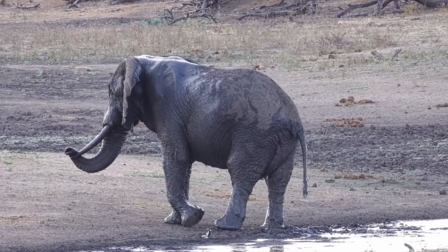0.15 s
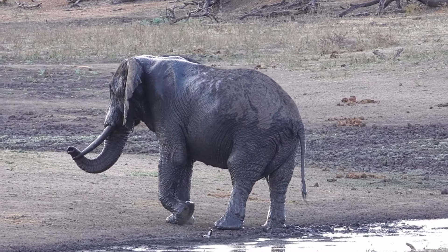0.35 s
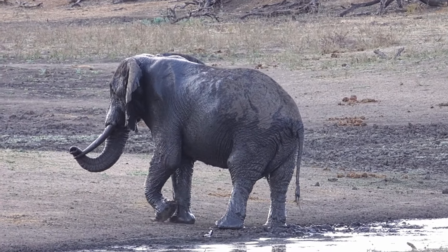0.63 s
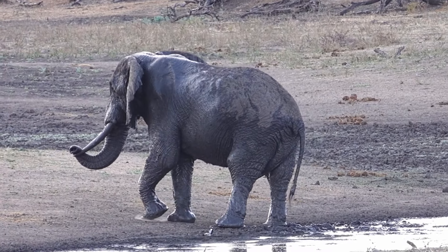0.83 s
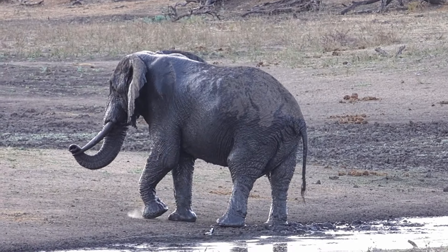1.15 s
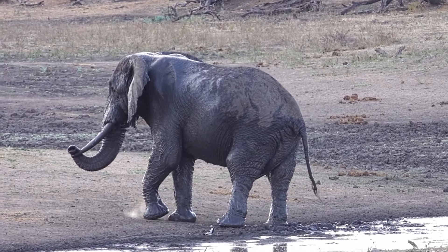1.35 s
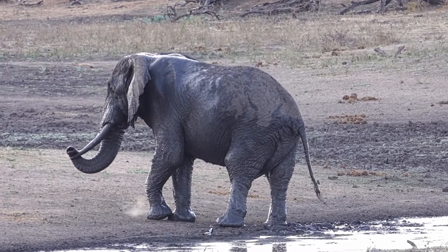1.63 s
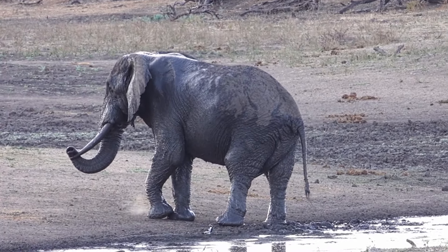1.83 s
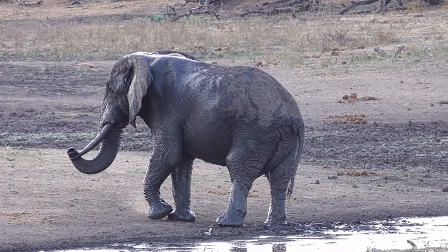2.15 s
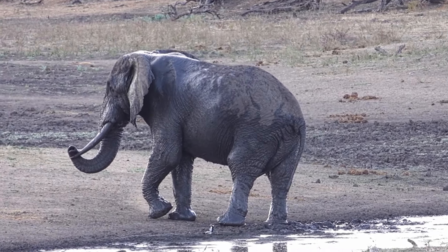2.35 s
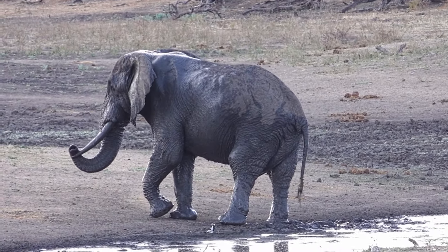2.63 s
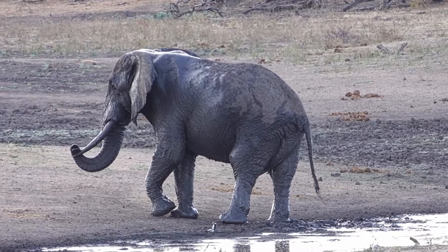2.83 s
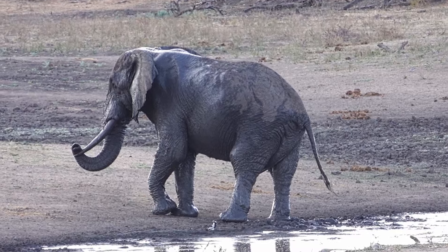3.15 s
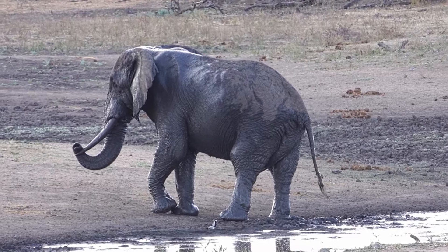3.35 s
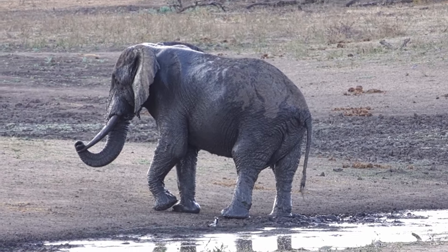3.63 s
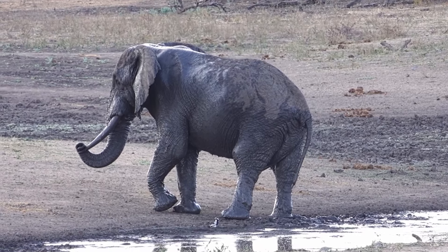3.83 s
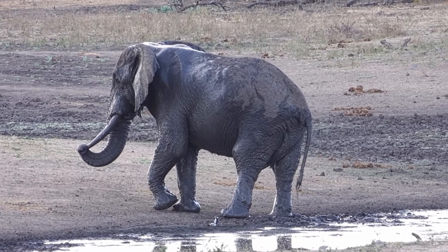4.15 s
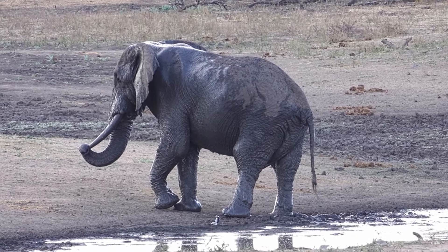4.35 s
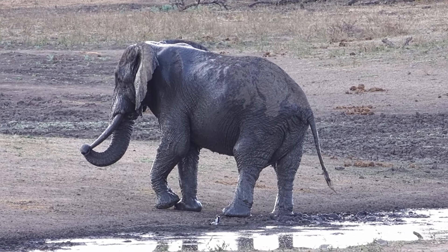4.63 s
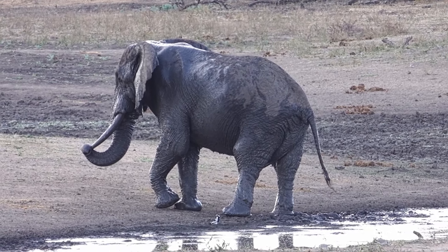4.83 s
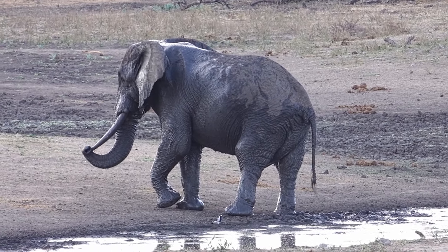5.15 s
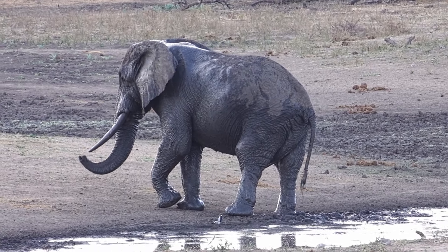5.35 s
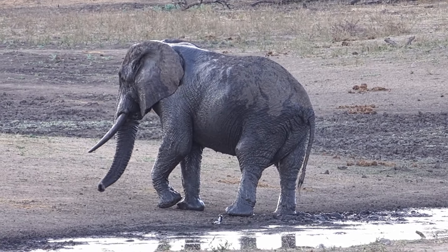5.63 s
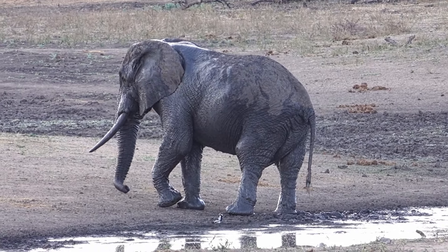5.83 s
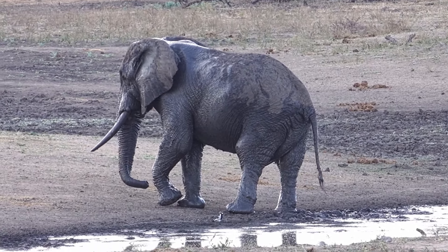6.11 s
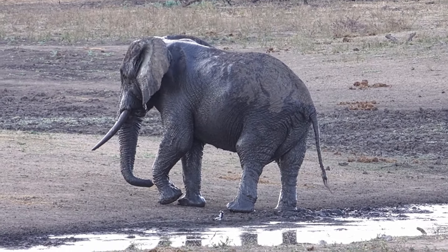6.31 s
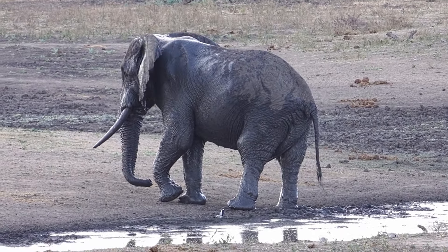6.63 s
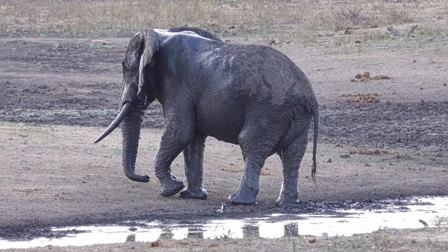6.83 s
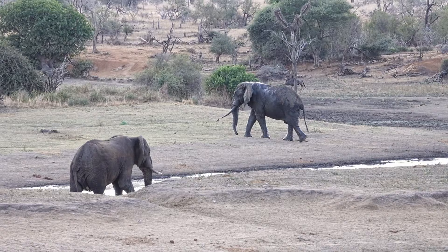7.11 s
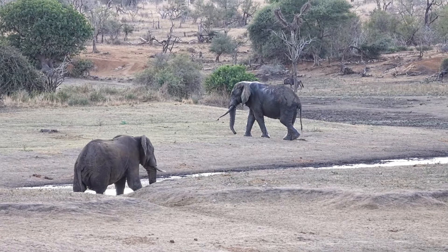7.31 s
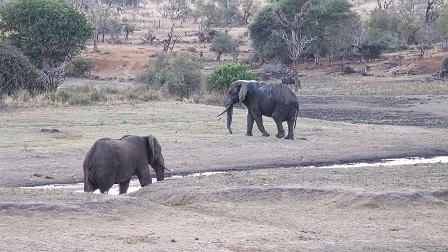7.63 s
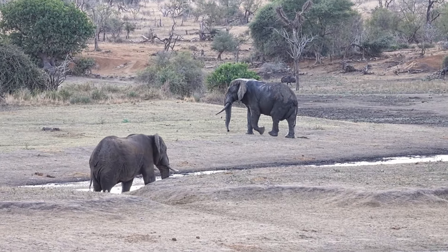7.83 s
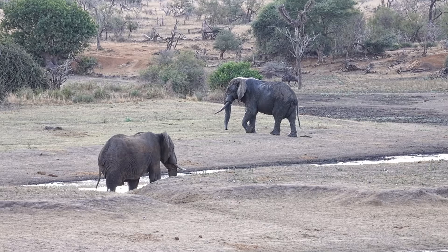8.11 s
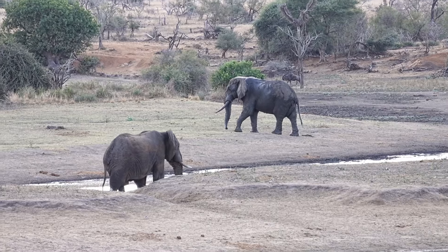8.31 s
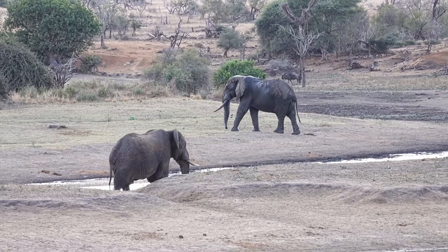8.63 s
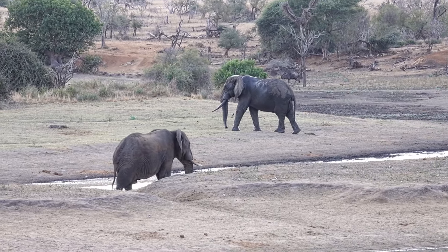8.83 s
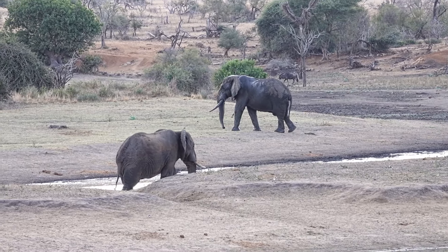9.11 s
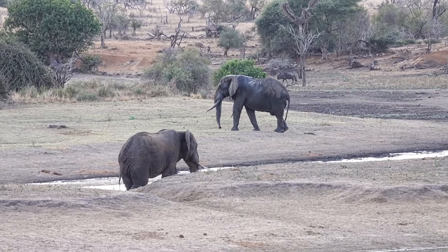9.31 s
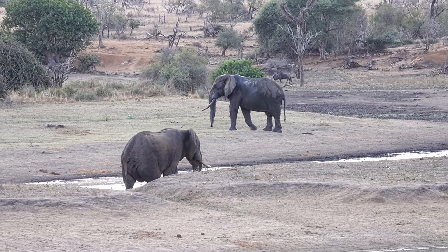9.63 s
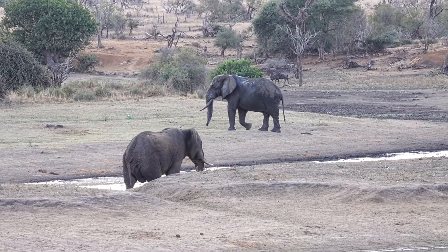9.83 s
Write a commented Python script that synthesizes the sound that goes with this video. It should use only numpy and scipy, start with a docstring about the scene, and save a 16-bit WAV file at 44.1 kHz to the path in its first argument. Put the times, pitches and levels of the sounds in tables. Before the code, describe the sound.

A wide, open waterhole in dry bush, heard through an exposed microphone. Throughout, a frog pips about fourteen times a second around a mid-high pitch, swelling and easing, over hiss, uneven low rumble, grassy breeze and a shimmering far chorus of chirps. A dove repeats a rolling, arched coo phrase about every 1.2 seconds. Deep wind buffets thump from 0.4 to 1 second, strongest at 1. Whistles cluster near 1.2, and a loud hoarse chip snaps at 1.55. Quick five-note twitters recur; buzzy, growing chirrups peak around 2.5, 3.1, 3.8, 4.5, 5.2, 6.1, 7.3 and 8.7. A scolding chatter comes at 3.6 and faintly at 9.4. A clear falling whistle rings at 5.9, more at 7.1 to 7.5. Dull close knocks come faintly at 2.1 and 5.4, then around 7 to 8.3 and 9.2 to 9.5, among rasps and distant downslurs.

```python
"""Birds and a frog call around a waterhole in dry bush.
From the start a frog pips steadily over hiss, rumble, breeze in the grass and a far chorus of chirps.
Gliding tones make falling notes, a dove's rolled phrase, ticks and whistles; noise bands make rasps.
Slowing swings buffet the microphone, mostly in the first second; quick twitters and far slurs join in.
Then come sharp chips, soft knocks of noise and dying modes, buzzy chirrups and a scolding chatter."""
import sys
import numpy as np
from scipy import signal
from scipy.fft import rfft, irfft, next_fast_len
from scipy.io import wavfile
from scipy.ndimage import uniform_filter1d

SR = 44100
rng = np.random.default_rng(int(sys.argv[2]) if len(sys.argv) > 2 else 0)


def dump(signal):
    """Clip the signal to [-1, 1] and save it as 16-bit WAV at the path in sys.argv[1]."""
    limited = np.clip(np.atleast_2d(signal).T, -1, 1)
    pcm = np.round(limited * 32767).astype(np.int16)
    wavfile.write(sys.argv[1], SR, pcm)


N = 439677
TIME = np.arange(N) / SR


def amp(db):
    """Decibels to gain."""
    return 10 ** (np.asarray(db) / 20)


def unit(x):
    """Scales to rms 1."""
    return x / np.sqrt(np.mean(abs(x) ** 2) + 1e-20)


def clock(length_s):
    """Sample times over a length, at least 16 samples."""
    return np.arange(max(int(length_s * SR), 16)) / SR


def follow(curve):
    """A curve of (time [s], value) rows at every sample."""
    return np.interp(TIME, *np.transpose(curve))


def add(mix, start_s, sound):
    """Mixes a sound in at its start time, cut to fit."""
    start = round(start_s * SR)
    sound = sound[max(-start, 0):]
    part = mix[max(start, 0):][:len(sound)]
    part += sound[:len(part)]


def noise(spectrum, size):
    """Noise of rms 1 shaped by (frequency [Hz], level [dB]) points."""
    hz, db = np.transpose(spectrum)
    padded = next_fast_len(size)
    log_hz = np.log(np.fft.rfftfreq(padded, 1 / SR) + 1)
    shape = amp(np.interp(log_hz, np.log(hz), db))
    return unit(irfft(rfft(rng.standard_normal(padded)) * shape, padded)[:size])


def drift(t, rate_hz):
    """Random values at a given rate, joined by straight lines."""
    points = rng.standard_normal(4096)
    return np.interp(t * rate_hz, np.arange(len(points)), points)


def tone(hz):
    """A sine of rms 1 that follows a pitch curve."""
    return np.sqrt(2) * np.sin(2 * np.pi * np.cumsum(hz) / SR)


def scatter(x, t60_s, wet_db):
    """Adds the many faint echoes of ground and bushes as sparse, decaying random taps."""
    t = clock(.7)
    sparse = rng.standard_normal(len(t)) * (rng.random(len(t)) < .1)
    taps = sparse * amp(-60 * t / t60_s) * (t > .003)
    return x + amp(wet_db) * signal.oaconvolve(x, taps / np.linalg.norm(taps))[:N]


def whistle(length_s, pitches_hz, crest, waver=.004, flutter_db=2):
    """A pure note gliding through three pitches, swelling to its crest (share of length) and fading."""
    t = clock(length_s)
    u = t / t[-1]
    glide_hz = np.polyval(np.polyfit(np.arange(3) / 2, pitches_hz, 2), u)
    hz = glide_hz * (1 + waver * drift(t, 250))
    ramp = np.interp(u, [0, np.clip(crest, .1, .85), 1], [0, 1, 0])
    swell = np.sin(np.pi / 2 * ramp) ** .9
    return unit(tone(hz) * swell * amp(flutter_db * drift(t, 110)))


def rasp(length_s, hz, width_hz):
    """A harsh note: a band of noise around its pitch."""
    size = len(clock(length_s))
    skirt = 1 + width_hz / hz
    band = [(hz / skirt ** 3, -55), (hz / skirt, -14), (hz, 0), (hz * skirt, -14), (hz * skirt ** 3, -55)]
    return unit(noise(band, size) * signal.windows.tukey(size, .8))


def frog(pitch_hz=1542, sag_hz_per_s=6500, width_s=0.0043, uneven_db=1.45):
    """About fourteen short pips a second, slowing as it tires, uneven in strength and sagging in pitch."""
    # effort swelling and easing in bouts: (time [s], level [dB])
    effort = [(0.0, -67), (1.41, -46), (2.65, -45), (2.76, -41), (3.5, -52.5), (4.22, -44), (4.82, -56),
              (6.12, -50.5), (6.37, -43.5), (7.06, -54.5), (7.53, -47), (8.24, -46), (8.8, -50.5),
              (8.88, -43), (9.68, -52.5), (9.9, -49.5)]
    first_pip_s, pips_per_s, tires_at_s = -.008, 14.04, 3.65
    slowing = .0656  # pips/s lost each second
    peak_db = 13.5  # pip peak over the effort
    count = pips_per_s * (TIME - first_pip_s) - slowing * np.maximum(TIME - tires_at_s, 0) ** 2 / 2
    pip = np.round(count).astype(int)
    t = (count - pip) / np.gradient(count) / SR  # seconds from the nearest pip
    strength, detune = rng.standard_normal((pip.max() + 1, 2))[pip].T
    turns = pitch_hz * (1 + 0.01 * detune) * t - sag_hz_per_s * t ** 2 / 2
    envelope = amp(uneven_db * strength) * np.exp(-.5 * (t / width_s) ** 2)
    pips = envelope * np.sin(2 * np.pi * turns)
    return scatter(pips * amp(follow(effort) + peak_db), t60_s=.25, wet_db=-10)


def air():
    """Steady hiss, an uneven low rumble and the breeze in the dry grass, all shaped noise."""
    # hiss spectrum: (frequency [Hz], level [dB])
    hiss_spectrum = [(12, -31), (20, -9.5), (60, 1), (347, -18.5), (949, -25), (1370, -17.5), (1530, -13.5),
                     (1710, -13.5), (1910, -13), (3340, -14.5), (3950, -15), (6540, -33.5), (9950, -39.5),
                     (14300, -38), (16000, -39.5)]
    # breeze strength: (time [s], level [dB])
    breeze = [(0.0, -59), (0.77, -49), (1.39, -60), (1.8, -55.5), (6.05, -64), (7.94, -59), (8.36, -65.5),
              (9.97, -66)]
    # grass rustle spectrum: (frequency [Hz], level [dB])
    rustle_spectrum = [(100, -8), (250, -10), (700, 1.5), (1300, -3), (2500, -10), (8000, -42)]
    rustle_db = 4.5  # over the breeze strength
    eddies = noise([(15, -17), (35, 3.5), (70, -10.5), (150, -13), (400, -27.0), (2000, -79)], N)
    rumble = eddies * amp(-49.5 + 2.2 * drift(TIME, 7.9))
    hiss = amp(-45.5) * noise(hiss_spectrum, N)
    rustle = amp(follow(breeze) + rustle_db) * noise(rustle_spectrum, N)
    return hiss + rumble + rustle


def far_chorus(count=620):
    """Many distant chirps with dense echoes over a shimmering wash of noise."""
    # chorus spectrum: (frequency [Hz], level [dB])
    spectrum = [(1200, -28), (1700, -2.5), (2300, -3.5), (3000, -3.5), (3600, -2.5), (3950, 6.5),
                (4400, -10.5), (5200, -14), (6500, -26), (9000, -37)]
    level_db, swell_db, swell_rate_hz = -46.5, 0.5, 3.03
    wash_db = -4  # the most distant chirps merge into a wash; level relative to the rest
    chirps = np.zeros(N)
    for when, pitch, length, glide, size in rng.random((count, 5)):
        hz = 2400 + 4200 * pitch ** 1.5
        bend = 0.1695 * (glide - .25)  # most of them fall
        db = 10 * size + np.interp(hz, *np.transpose(spectrum)) + 3 * (hz / 4000) ** 2
        pitches_hz = hz * np.array([1 + bend, 1, 1 - bend])
        note = whistle(.012 + .05 * length, pitches_hz, .4, waver=.012)
        add(chirps, when * TIME[-1], amp(db) * note)
    wash = noise(spectrum, N) * amp(1.3 * drift(TIME, 25))
    mix = unit(scatter(chirps, t60_s=.35, wet_db=-3)) + amp(wash_db) * wash
    return amp(level_db + swell_db * drift(TIME, swell_rate_hz)) * mix


def falling_notes(count=22):
    """Notes that drop fast and level off: some stand out, fainter ones come at random."""
    # notes from a little farther off: (start [s], length [s], middle pitch [Hz], level [dB])
    falls = [(.04, 0.071, 3680, -41.5), (0.189, 0.081, 3620, -40), (0.453, 0.093, 3480, -49),
             (0.807, 0.065, 3280, -38.5), (0.956, 0.07, 3440, -39), (3.387, 0.065, 3240, -44.5),
             (4.496, 0.078, 2950, -40.5), (4.626, 0.08, 2950, -41), (4.989, .14, 4150, -47),
             (5.098, .075, 3080, -42), (5.37, 0.13, 4110, -46), (5.49, 0.066, 3950, -43),
             (6.683, 0.1, 2960, -43), (7.61, 0.056, 2950, -45), (7.899, 0.088, 3570, -39.5),
             (8.42, .15, 3030, -46.5), (8.899, .12, 3100, -45), (9.878, 0.097, 3390, -45.5)]
    shape, crest = (1.16, 0.97, .89), 0.54  # pitch factors at start, middle and end
    stray_db, stray_hz = -47.5, (2800, 4940)
    out = np.zeros(N)
    strays = []
    for when, length, pitch in rng.random((count, 3)):
        hz = np.interp(pitch, [0, 1], stray_hz)
        strays.append((when * TIME[-1], .04 + .07 * length, hz, stray_db - 6 * pitch))
    for s, length_s, hz, db in list(falls) + strays:
        note = whistle(length_s, hz * np.array(shape), crest, waver=.01, flutter_db=2)
        add(out, s, amp(db - 1) * note)
    return scatter(out, t60_s=.3, wet_db=-6)


def dove(coo_hz=(930, 1060, 950), high_hz=(975, 1010, 935), low_hz=(875, 830, 815)):
    """Arched coos, most breaking into a roll: a soft low note and a louder high arch take turns."""
    # repeats of the phrase: (time [s], level [dB])
    phrases = [(.054, -42.5), (1.235, -44.5), (2.411, -48.5), (3.617, -46.5), (4.802, -46), (6.031, -44),
               (7.21, -50)]
    # notes of a phrase: (delay [s], rolls after the coo [count], roll step [s], relative level [dB])
    phrase_notes = [(0, 2, .021, 2), (.343, 7, .0345, -0.5), (.725, 0, .02, -4)]
    out = np.zeros(N)
    notes = [(start + delay, rolls, step_s, level + note_db)
             for start, level in phrases
             for delay, rolls, step_s, note_db in phrase_notes]
    for s, rolls, step_s, db in notes:
        coo = whistle(.052, coo_hz, .45, waver=.003, flutter_db=.8)
        add(out, s - .002, amp(db - 3) * coo)
        for k in range(round(rolls)):
            at = s + .043 + k * step_s
            sink = rng.normal(1 - .004 * k, .014)
            low = whistle(.022, sink * np.array(low_hz), .5)
            add(out, at, amp(db - 7) * low)
            high_db = db - 4 + rng.normal(0, 1.5)
            high = whistle(.02, sink * np.array(high_hz), .5)
            add(out, at + .6 * step_s, amp(high_db) * high)
    return scatter(out, t60_s=.25, wet_db=-11)


def ticker(step_s=.071, pitches_hz=(5600, 7000, 5400)):
    """Tiny high arched notes in quick runs."""
    # runs: (start [s], end [s], level [dB])
    runs = [(0.104, .42, -55.5), (2.176, 2.62, -54.5), (2.925, 3.2, -53), (4.995, 5.5, -58)]
    out = np.zeros(N)
    for start, end, db in runs:
        for s in np.arange(start, end, step_s):
            tick_db = db - 7 + rng.normal(0, 2.4)
            add(out, s - .01, amp(tick_db) * whistle(0.016, pitches_hz, 0.76, waver=0.089))
    return scatter(out, t60_s=0.073, wet_db=-3)


def near_whistlers():
    """Clear whistles that glide gently, with little echo."""
    # whistles: (start [s], length [s], start pitch [Hz], end pitch [Hz], level [dB])
    whistles = [(0.186, .055, 1760, 1700, -46.5), (.27, 0.042, 3030, 2900, -40),
                (1.077, 0.037, 3810, 3590, -36.5), (1.157, 0.058, 2550, 2880, -39.5),
                (1.174, 0.1, 2920, 2830, -33.5), (1.253, 0.09, 2900, 2730, -42),
                (1.316, .055, 3620, 3400, -39), (4.389, 0.25, 2440, 2620, -43),
                (4.898, .13, 2810, 2500, -32.5), (5.27, .34, 2470, 2532, -38.5),
                (5.545, 0.15, 2540, 2800, -42), (5.728, 0.082, 3560, 3360, -47),
                (5.899, 0.078, 2800, 2603, -24.5), (5.97, 0.053, 2640, 2440, -34.5),
                (7.127, 0.023, 2905, 3030, -28.5), (7.274, 0.11, 3224, 3004, -29.5),
                (7.537, 0.097, 3570, 3200, -32.5), (8.024, 0.055, 5000, 5160, -43),
                (9.152, 0.13, 2830, 2890, -43), (9.304, 0.034, 3180, 3730, -37)]
    dip, crest = 0.019, 0.53  # dip: share by which the pitch sags at mid-note
    out = np.zeros(N)
    for s, length_s, start_hz, end_hz, db in whistles:
        pitches_hz = (start_hz, (start_hz + end_hz) / 2 * (1 - dip), end_hz)
        add(out, s, amp(db) * whistle(length_s, pitches_hz, crest, waver=.002, flutter_db=1))
    return scatter(out, t60_s=.2, wet_db=-17)


def raspers(length_s=0.068, width_hz=430):
    """Harsh single calls made of narrow noise bands, without echo."""
    # calls: (time [s], pitch [Hz], level [dB])
    rasps = [(0.243, 3920, -43), (1.94, 3900, -46), (2.064, 3660, -38.5), (3.231, 2220, -39),
             (3.442, 4070, -39.5), (4.3, 3800, -42.5), (5.335, 3830, -43), (5.518, 3880, -43),
             (6.346, 1750, -45.5), (7.68, 2130, -43.5), (8.534, 3900, -40.5), (8.911, 3840, -41.5),
             (9.035, 3500, -42.5)]
    out = np.zeros(N)
    for s, hz, db in rasps:
        add(out, s, amp(db - 1.5) * rasp(length_s, hz, width_hz))
    return out


def buffets():
    """Each puff pushes the microphone to and fro for a few slowing cycles."""
    # puffs: (time of the height [s], half length [s], pitch at the height [Hz], level [dB])
    puffs = [(0.387, .013, 60.6, -20.5), (.643, 0.034, 70, -13), (0.761, 0.018, 71, -11),
             (1.004, 0.035, 69, -6), (2.689, .028, 50.4, -33.5), (2.835, 0.023, 57.4, -28.5),
             (3.535, 0.01, 74.6, -29), (7.04, 0.055, 46.3, -27)]
    slowing_per_s, rough = 9.1, 0.26  # rough: share of eddies
    steepening = 0.47  # a hard swing steepens and gains an octave overtone
    out = np.zeros(N)
    for s, half_s, hz, db in puffs:
        t = clock(6 * half_s) - 3 * half_s
        angle = 2 * np.pi * hz * (1 - np.exp(-slowing_per_s * t)) / slowing_per_s
        swing = amp(db) * np.exp(-(t / half_s) ** 2)
        overtone = steepening * swing ** 2 * np.sin(2 * angle)
        add(out, s + t[0], -swing * np.cos(angle) - overtone)
    eddies = noise([(30, 11.5), (90, -0.5), (200, -16.5), (500, -23.5), (3000, -73)], N)
    return out * (1 + rough * eddies)


def twitterer(step_s=.024, pitches_hz=(4400, 4370, 3850)):
    """Runs of five short hooked notes, loudest in the middle."""
    # twitters: (time of the middle note [s], level [dB])
    twitters = [(0.517, -33.5), (1.206, -31), (1.747, -33), (2.076, -31.5), (2.899, -32), (3.657, -33.5),
                (4.083, -34.5), (4.429, -35), (4.827, -31.5), (5.165, -34), (6.628, -33), (7.508, -33.5),
                (8.002, -34), (8.679, -36), (9.289, -33), (9.643, -35)]
    out = np.zeros(N)
    for s, db in twitters:
        for k, note_db in enumerate((-10, -2.5, -1.5, -2, -21.5)):
            note = whistle(0.0162, np.array(pitches_hz) * rng.normal(1, 0.014), 0.79)
            add(out, s + (k - 2) * step_s - .005, amp(db + note_db - 4.5) * note)
    return scatter(out, t60_s=0.13, wet_db=-8)


def far_whistlers():
    """High downslurs and upsweeps from deep in the bush that quiver among their echoes."""
    # downslurs: (start [s], length [s], level [dB])
    downslurs = [(.756, 0.05, -47), (0.984, 0.028, -40.5), (2.551, .15, -46), (2.979, 0.15, -45.5),
                 (3.1, 0.16, -50), (3.361, .13, -41.5), (4.266, 0.12, -53.5), (6.255, 0.061, -50.5),
                 (6.79, .07, -54), (7.06, 0.077, -51), (7.384, .1, -48), (7.779, 0.072, -43.5),
                 (8.11, 0.059, -44), (8.427, .15, -47.5), (8.838, 0.16, -49), (9.722, 0.14, -52.5)]
    # upsweeps: (start [s], top pitch [Hz], level [dB])
    upsweeps = [(.63, 5370, -49), (.82, 8150, -48.5), (1.111, 8300, -48), (1.251, 8200, -48),
                (4.868, 6400, -51), (5.2, 6900, -47.5), (5.611, 7650, -52.5), (5.74, 7040, -54),
                (7.518, 7500, -49)]
    slur_top_hz, slur_fall, slur_fall_per_s = 6100, 0.28, .7  # a longer slur falls by a larger share
    sweep_from_hz, sweep_s = 4230, .056
    out = np.zeros(N)
    for s, length_s, db in downslurs:
        end_share = 1 - slur_fall - slur_fall_per_s * length_s
        pitches_hz = slur_top_hz * end_share ** (np.arange(3) / 2)
        add(out, s, amp(db - 1) * whistle(length_s, pitches_hz, .85, waver=.016, flutter_db=3))
    for s, top_hz, db in upsweeps:
        pitches_hz = (sweep_from_hz, np.sqrt(sweep_from_hz * top_hz), top_hz)
        add(out, s, amp(db - 1) * whistle(sweep_s, pitches_hz, .25, waver=.016, flutter_db=3))
    return scatter(out, t60_s=.3, wet_db=-3)


def chipper(rise_s=0.0036):
    """A short, hoarse, falling note and a bright noise click under one sharp, decaying envelope."""
    # calls of a close bird: (time [s], pitch [Hz], level [dB], decay [s], click level [dB])
    chips = [(1.55, 2240, -13.5, 0.014, -33.5), (6.957, 1830, -36, .012, -44),
             (6.963, 3040, -27, 0.017, -55), (6.989, 3000, -39, 0.013, -47),
             (7.126, 2970, -42, .012, -45.5)]
    click_spectrum = [(1000, -10), (2500, 0), (6000, -8), (8000, -2), (10500, -9), (13500, -1), (16000, -5)]
    out, t = np.zeros(N), clock(.034)
    for s, hz, db, decay_s, click_db in chips:
        attack = np.minimum(t / rise_s, 1) ** 2
        decay = np.exp(-np.maximum(t - rise_s, 0) / decay_s)
        shape = attack * decay * signal.windows.tukey(len(t), .15)
        voice = tone(hz * (1 - .9 * t + .03 * drift(t, 500))) * amp(-3 + 2 * drift(t, 300))
        click = noise(click_spectrum, len(t))
        add(out, s, shape * (amp(db) * voice + amp(click_db) * click))
    return scatter(out, t60_s=0.1, wet_db=-17)


def knocks():
    """Dull blows close by: a tap, a short scuff of noise and a few quickly dying low modes."""
    # blows: (time [s], level [dB], treble tilt about 140 Hz [dB/decade], decay [s])
    blows = [(2.094, -43, 9, 0.045), (5.417, -36.5, -12, 0.025), (6.95, -28, 0.5, 0.021),
             (6.991, -40, -11, 0.15), (7.175, -31, -14, 0.036), (7.289, -40.5, -2, 0.055),
             (7.705, -41.5, -15, 0.032), (7.905, -38, -7, 0.056), (8.318, -38, -19, 0.021),
             (9.187, -33.5, -9.5, 0.024), (9.295, -32.5, -16, 0.014), (9.355, -36, -10, 0.012),
             (9.505, -35.5, -20.5, 0.019)]
    # scuff spectrum before tilt: (frequency [Hz], level [dB])
    scuff_spectrum = [(25, 3), (70, -22), (140, 0), (230, 1.5), (450, -9.5), (800, 0.5), (1200, -14),
                      (3000, -36), (16000, -73)]
    # ringing modes before tilt: (frequency [Hz], level [dB], decay factor [1])
    modes = [(52.3, -5, 2), (144, -0.5, 0.85), (226, -4.5, 0.8), (361, -7.5, 0.21), (487, -7.5, 0.53),
             (790, -3, 0.18)]
    out, t = np.zeros(N), clock(.3)
    tap = np.exp(-t / .0004) * np.sin(2 * np.pi * 700 * t)
    for s, db, treble_db, decay_s in blows:
        tilted = [(hz, level + treble_db * np.log10(hz / 140)) for hz, level in scuff_spectrum]
        scuff = noise(tilted, len(t)) * np.exp(-t / decay_s) * np.minimum(t / 0.0012, 1)
        ring = np.zeros(len(t))
        for hz, level, slow in modes:
            gain = amp(level + treble_db * np.log10(hz / 140))
            mode_hz = hz * rng.normal(1, 0.037)
            ring += gain * np.exp(-t / (decay_s * slow)) * np.sin(2 * np.pi * mode_hz * t)
        add(out, s, amp(db) * (amp(-4) * scuff + ring + amp(6 + treble_db) * tap))
    return out


def chirruper(step_s=0.024, split_s=.009, high_hz=3950, low_hz=3915, growth_db=3.0):
    """Four ragged syllables that grow louder, each a pair of falling pulses, and a weak closing one."""
    # chirrups of a near bird: (time of the last and loudest syllable [s], level [dB])
    chirrups = [(2.505, -24), (3.129, -19), (3.84, -25), (4.468, -25), (5.24, -19.5), (6.076, -19),
                (6.525, -32.5), (6.942, -36), (7.346, -22.5), (8.681, -20), (9.5, -34.5)]
    out = np.zeros(N)
    for s, db in chirrups:
        for back in range(-1, 4):  # syllables before the loudest; -1 closes
            level = db + (-13 if back < 0 else -growth_db * back ** 1.6)
            flat = 1 - 0.0059 * abs(back)  # the quiet syllables sit lower
            at = s - back * step_s
            for offset_s, hz in ((-split_s / 2, high_hz), (split_s / 2, low_hz)):
                pitches_hz = flat * hz * np.array([1.015, 1.004, .965])
                pulse = whistle(.013, pitches_hz, .6, waver=.009)
                add(out, at + offset_s - .007, amp(level - 4.5) * pulse)
            add(out, at - .011, amp(level - 13) * rasp(.026, 3800, width_hz=350))
    overtone = out ** 3 / (uniform_filter1d(out ** 2, size=90) + 1e-6)  # cubic distortion
    return scatter(out + amp(-36) * overtone, t60_s=.16, wet_db=-13)


def scolder(gap_s=0.0173, harsh_hz=2800, falling_hz=(3850, 3350, 3050)):
    """Each note is a short rasp that flips into a clear falling whistle."""
    # runs of two-part notes: (start [s], notes [count], level [dB])
    chatter = [(3.632, 5, -33.5), (9.39, 6, -41)]
    step_s = .088
    out = np.zeros(N)
    for start, count, db in chatter:
        for k in range(round(count)):
            s = start + k * step_s
            add(out, s - .014, amp(db - 8.5) * rasp(0.025, harsh_hz, width_hz=610))
            fall = whistle(0.0263, falling_hz, 0.61, waver=0.025)
            add(out, s + gap_s - .005, amp(db - 7.5) * fall)
    return scatter(out, t60_s=0.1, wet_db=-3.5)


def scene():
    """All the callers, the air, the buffets and the knocks at one microphone."""
    birds = falling_notes() + dove() + ticker() + near_whistlers() + raspers()
    birds += twitterer() + far_whistlers() + chipper() + chirruper() + scolder()
    return (frog() + air() + far_chorus() + birds + buffets() + knocks())[None]


def record(dry):
    """The recorder's band limit, a linear-phase low-pass."""
    edge_hz = 15750
    lowpass = signal.firwin(511, edge_hz, window=("kaiser", 9), fs=SR)
    return signal.oaconvolve(dry, lowpass[None], "same")


dry = scene()
out = record(dry)
dump(out)
```